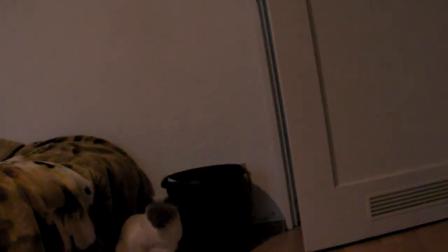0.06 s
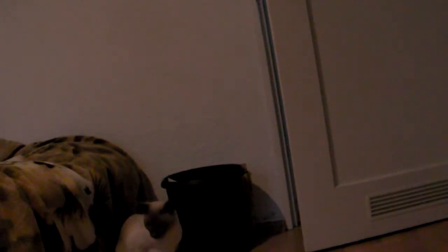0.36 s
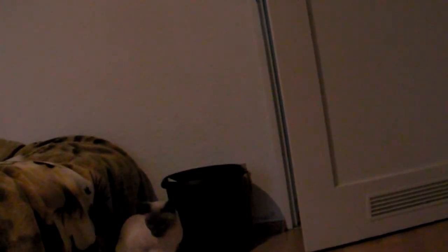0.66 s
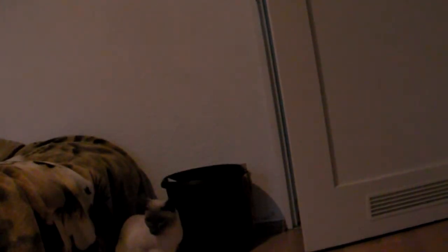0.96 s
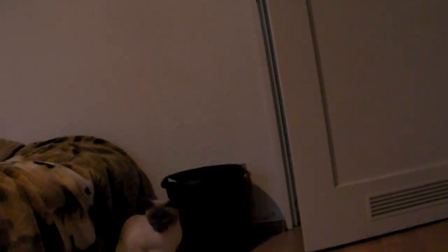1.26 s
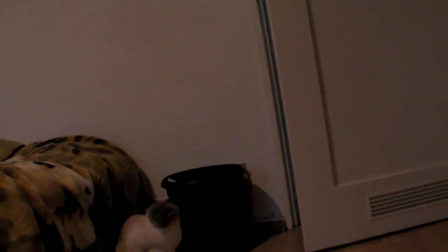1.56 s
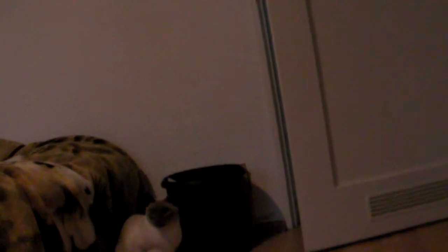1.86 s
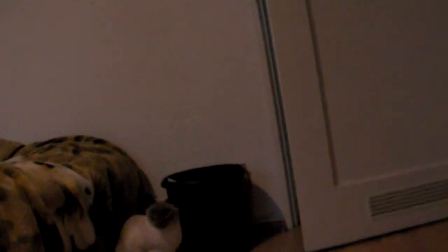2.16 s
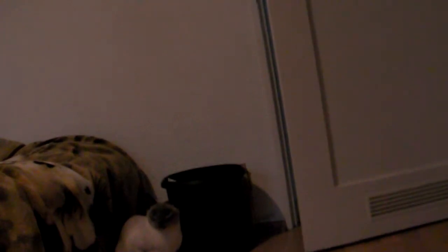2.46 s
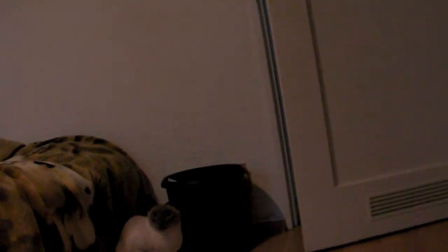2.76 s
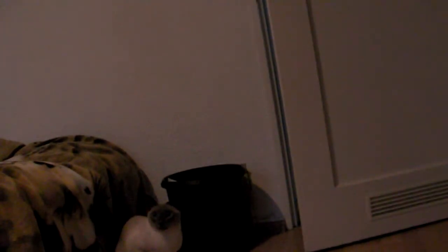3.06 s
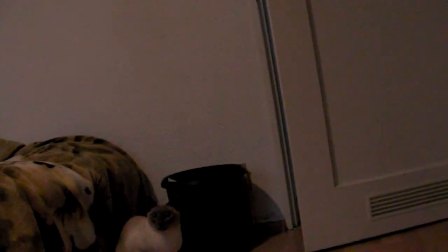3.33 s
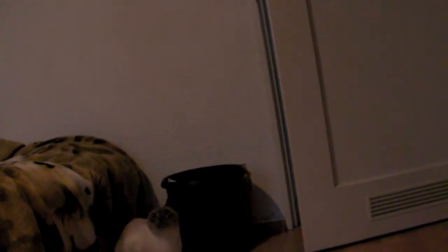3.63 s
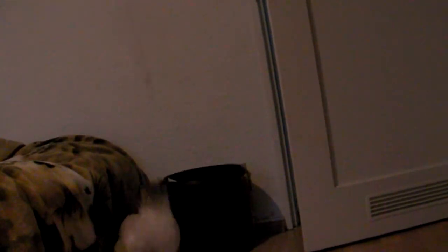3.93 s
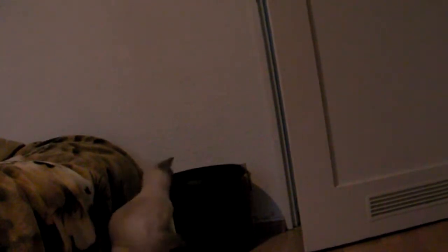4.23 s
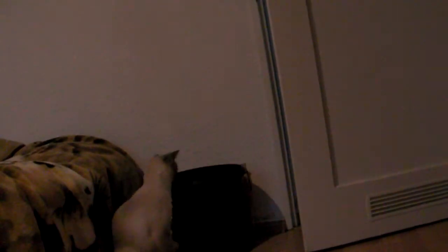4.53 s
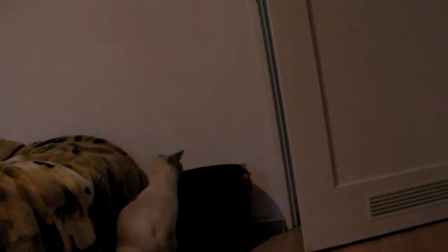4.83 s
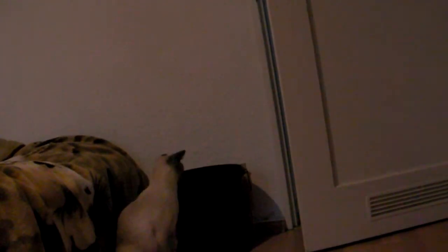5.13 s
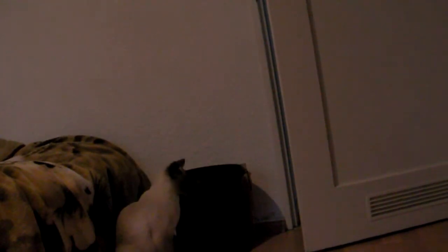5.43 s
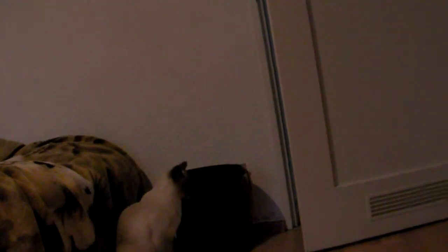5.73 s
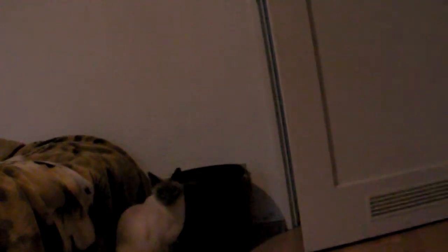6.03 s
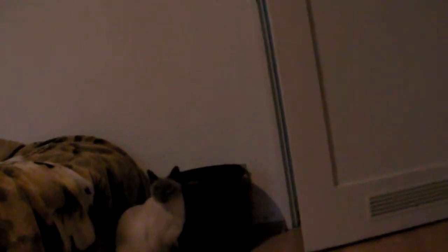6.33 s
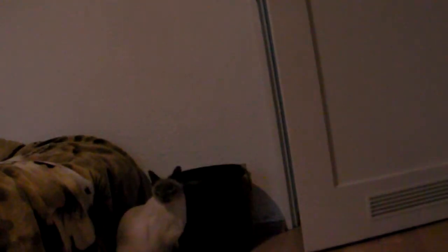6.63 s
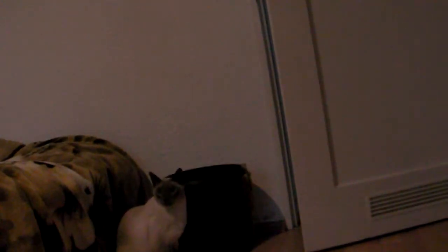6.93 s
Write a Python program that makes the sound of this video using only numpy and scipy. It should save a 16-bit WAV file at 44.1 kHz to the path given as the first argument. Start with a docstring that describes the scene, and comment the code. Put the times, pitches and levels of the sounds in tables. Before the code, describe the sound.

Close to the microphone on the left, hands softly rustle a sheet of paper with a few small snaps, then fall almost still. Further off in front, a thrown paper ball hits something hollow and skitters briefly on the floor. Close up again, a new sheet slides, flaps and is crumpled loudly, with sharp creases snapping over dense crackle. The small room has a faint low hum and hiss.

```python
"""Paper for a cat to chase

Small room, two-port microphone, the hands close on the left. A sheet rustles softly as tiny buckles
give way. Further off in front, a thrown paper ball sets something hollow ringing and skitters on the
floor. Close up again, a new sheet slides off the pile, flaps and is crushed: creases snap over crackle."""
import sys
import numpy as np
from scipy import signal
from scipy.fft import rfft, irfft, next_fast_len
from scipy.io import wavfile
from scipy.ndimage import uniform_filter1d

SR = 44100
rng = np.random.default_rng(int(sys.argv[2]) if len(sys.argv) > 2 else 0)


def pcm_store(signal):
    """Save signal as 16-bit PCM."""
    levels = np.round(np.clip(np.atleast_2d(signal), -1, 1) * 32767)
    wavfile.write(sys.argv[1], SR, levels.astype(np.int16).T)


N = 317079

# room tone, relative spectrum: f/Hz, level/dB
ROOM_TONE = [(20, -25), (34, -15), (44, -3.5), (58, -11), (78, -15), (105, -1), (128, -6), (155, -7.5),
             (275, -2.5), (460, -6.5), (660, -14.5), (800, -13), (1300, -19.5), (2200, -24), (15800, -28.5)]
# room tone across the two ports: f/Hz, left-right correlation
TONE_LIKENESS = [(40, 0.36), (400, 0.8), (1200, 0.27), (2500, -0.1), (6000, -0.4), (11000, -0.21),
                 (15000, -0.27)]
# low hum under it: f/Hz, rms level/dB
HUM = [(44, -61), (130, -62.5)]
# decay of the room: f/Hz, t60/s
ROOM_T60 = [(150, 1.1), (1000, 0.56), (4000, 0.38), (14000, 0.78)]
# what the walls send back: f/Hz, gain/dB
WALL_COLOUR = [(100, -6), (400, -0.5), (1500, 3), (3500, 4.5), (7000, 1.5), (10000, 1), (15000, -17)]
# the hands as the two ports hear them: f/Hz, lead of the left/rad
PORT_PHASE = [(100, 0), (1300, .6), (2000, 1.8), (3300, 2.4), (3800, 1.9), (4700, 3.0), (9000, 3.3),
              (10500, 4.7), (11700, 4.7), (12700, 6.0), (16000, 6.0)]
# and their balance: f/Hz, left over right/dB
PORT_BALANCE = [(100, 3.5), (1300, 3.5), (1750, -4), (2400, 11), (2950, 6.5), (3500, 6), (4300, 6),
                (6500, 0.5), (8200, 2.5), (9200, -11), (10500, -2), (16000, 0.5)]

# a small tap in front: t/s, level/dB
TAP = [(1.961, -35)]
# its modes: f/Hz, gain/dB, t60/s
TAP_MODES = [(793, 6, 0.019), (1000, -7, 0.02), (2030, -9, 0.018), (2800, -9, 0.014)]
# blows of the ball on a hollow body: t/s, level/dB
THUMPS = [(4.033, -22), (4.037, -20.5), (4.126, -34), (4.171, -29.5), (4.262, -49), (4.452, -35.5)]
# modes of that body: f/Hz, gain/dB, t60/s
HOLLOW_MODES = [(110, -24, .2), (185.5, -1, 0.25), (206, -6.5, 0.28), (215.6, -5, 0.2), (337, -29, .2),
                (415, -12.5, 0.51), (560, -7.5, 0.11)]
# the ball crackling as it lands, before colouring: t/s, middle/dB, body/dB, air/dB, rise/s, fade/s
LANDINGS = [(4.032, -27.5, -20, -35.5, 0.00054, 0.018), (4.115, -21.5, -38, -40, 0.00091, 0.0059),
            (4.1265, -23.5, -58, -52, 0.0015, 0.03), (4.150, -31.5, -38, -40.5, 0.017, 0.031),
            (4.445, -43, -55, -51.5, 0.024, 0.048)]
# colour of the landing ball: f/Hz, gain/dB
BALL_COLOUR = [(110, 0), (450, -4), (800, -9), (1650, 2), (2300, -3.5), (3100, 0.5), (4500, -3),
               (9000, 3.5), (16000, 1)]

# colour of the sheet close up: f/Hz, gain/dB
PAPER_COLOUR = [(90, -5), (140, -4), (300, 3.5), (500, 1), (750, -1), (1300, 1), (1900, -1.5), (2700, 3),
                (3600, -0.5), (4800, 6), (6200, 2), (7600, 4), (9500, 1), (11500, -2), (13300, -1),
                (16000, -10)]
# fingers knocking on the slack sheet: t/s, level/dB
FINGER_KNOCKS = [(5.042, -32), (5.116, -34), (5.577, -36), (5.710, -27), (5.740, -23), (5.803, -25),
                 (6.507, -27.5), (7.017, -26), (7.082, -31)]
# its low, quickly damped modes: f/Hz, gain/dB, t60/s
SHEET_MODES = [(88, -5, 0.083), (139, 0, 0.072), (275, -2, 0.034), (420, 1.5, 0.049)]
# the whole sheet flexing, before colouring: t/s, middle/dB, body/dB, air/dB, rise/s, fade/s
FLAPS = [(5.040, -36, -28, -58, 0.0027, 0.0079), (5.116, -54, -23.5, -51, 0.001, 0.0042),
         (5.739, -20, -24, -57, 0.00064, 0.011), (5.796, -36, -17.5, -38, 0.0028, 0.0083),
         (5.825, -17, -33, -29, 0.029, 0.027), (6.006, -21, -31.5, -72, 0.005, 0.034),
         (6.1967, -24, -34, -64.5, 0.0005, 0.0028), (6.218, -22, -29.5, -63, 0.00048, 0.013),
         (6.357, -16.5, -29.5, -39, 0.0072, 0.037)]
# hand movements, each a swell of crackle: t/s, level/dB, rise/s, fade/s, relative body/dB, relative air/dB
HAND_STROKES = [(0.0, -34, 0.0017, 0.061, -20, 4), (0.26, -49.5, 0.021, 0.12, -38, 9),
                (0.32, -33.5, 0.068, 0.065, -21, -3.5), (0.559, -40.5, 0.03, 0.062, -17, -5),
                (0.67, -40.5, 0.075, 0.037, -24, 0), (0.78, -42.5, 0.071, 0.02, -35, -13),
                (1.04, -44.5, .06, 0.11, -25, -3.5), (1.13, -36, .055, 0.033, -29, -0.5),
                (1.29, -40, 0.062, 0.051, -20, 0), (1.61, -52, .06, 0.065, -20, 5),
                (2.029, -42, 0.051, 0.089, -24, 3), (2.2, -49, 0.058, 0.11, -11, -3),
                (2.58, -50.5, 0.068, .05, -23, -3), (3.31, -49, 0.17, .16, -10, -0.5),
                (4.68, -51, 0.16, 0.25, -10, 10.5), (4.94, -39, 0.097, 0.084, -16.5, -8),
                (5.069, -34.5, 0.04, 0.31, -13, 2.5), (5.3, -45, 0.046, 0.037, 1.5, 9.5),
                (5.5, -41.5, 0.11, 0.14, -2, 3.5), (5.635, -33.5, 0.034, 0.21, -6.5, -9),
                (5.735, -21.5, 0.062, 0.082, -10, -4.5), (6.36, -23, .03, 0.12, -11.5, -12.5),
                (6.47, -24, 0.034, 0.058, -7.5, -6), (6.57, -26.5, 0.094, 0.09, -15, 1),
                (6.69, -19.5, 0.049, 0.077, -14, -4), (6.77, -25, 0.084, 0.12, -19, 2),
                (7.011, -22, 0.017, 0.097, -7, 1), (7.081, -19.5, 0.051, 0.056, -12.5, 0)]
# the main creases buckling: t/s, level before trim/dB, facet f/Hz
MAIN_CREASES = [(0.0875, -22.5, 7300), (0.3449, -22.5, 2420), (0.4141, -16.5, 4700), (0.4527, -19, 6700),
                (0.7456, -24, 1260), (0.845, -30, 4500), (1.1676, -24, 1330), (1.1814, -20.5, 7600),
                (1.187, -18.5, 1400), (2.0812, -30, 7800), (2.185, -27.5, 3450), (2.5595, -35.5, 2500),
                (3.9263, -33, 3560), (5.1173, -18, 1310), (5.357, -34, 2000), (5.5758, -26.5, 930),
                (5.634, -5.5, 5230), (5.7394, -11, 4070), (5.7824, -14, 7400), (5.8, -13, 1210),
                (5.8095, -1.5, 7100), (5.8968, -13, 1530), (6.3693, -14, 3100), (6.3858, -11, 2770),
                (6.5363, -9, 5060), (6.5861, -5.5, 4500), (6.618, -8.5, 4800), (6.6971, -9.5, 4370),
                (6.7118, -5.5, 8000), (6.7954, -11.5, 1180), (6.8199, -11.5, 1860), (6.8353, -9.5, 4500),
                (6.8441, -10, 4200), (6.9276, -9.5, 1520), (6.9582, -8.5, 4140), (7.017, -7, 1870),
                (7.083, -7.5, 2700), (7.1358, -11, 1260), (7.1719, -9.5, 1350)]

TIME = np.arange(N) / SR
STEP = 16   # samples per envelope step
EDGES_HZ = np.geomspace(80, 16200, 19)
BANDS = [(np.sqrt(lo * hi), signal.butter(2, [lo, hi], "band", fs=SR, output="sos"))
         for lo, hi in zip(EDGES_HZ, EDGES_HZ[1:])]


def amp(db):
    """Decibels to gain."""
    return np.exp(np.asarray(db) * (np.log(10) / 20))


def at_hz(points, hz):
    """Read a table on a log-frequency axis."""
    f, value = np.transpose(points)
    return np.interp(np.log(np.maximum(hz, 1)), np.log(f), value)


def add(track, s, sound):
    """Mix a sound into a track at time s."""
    start = max(round(s * SR), 0)
    track[start:start + len(sound)] += sound[:N - start]


def fading(power, seconds):
    """Each step of a power envelope lingers and dies away exponentially; the total is kept."""
    keep = np.exp(-STEP / (seconds * SR))
    return signal.lfilter([1 - keep], [1, -keep], power + 1e-18)


def room_tone(mid_db=-50.5):
    """The still room at the microphone: soft rumble and hiss with a faint hum."""
    size = next_fast_len(N)
    hz = np.arange(size // 2 + 1) * SR / size
    mid, side = rfft(rng.standard_normal((2, size))) * amp(at_hz(ROOM_TONE, hz))
    alike = np.clip(at_hz(TONE_LIKENESS, hz), -.9, .99)
    mid, side = irfft([mid, side * np.sqrt((1 - alike) / (1 + alike))], size)[:, :N]
    hum = sum(amp(db) * np.sqrt(2) * np.sin(2 * np.pi * f * TIME) for f, db in HUM)
    return amp(mid_db) * np.array([mid + side, mid - side]) / mid.std() + hum


def reflections(x, early_db=-5.5, tail_db=-8.5, early_s=0.0015, wall_delay_s=0.0069, diffuse_hz=700):
    """The paper keeps moving, so its reflections blur into noise: quick ones nearby, then the walls."""
    out, white = 0, rng.standard_normal((2, 2, N))
    for k, (hz, sos) in enumerate(BANDS):
        power = np.add.reduceat(signal.sosfilt(sos, x) ** 2, np.arange(0, N, STEP)) / STEP
        early = amp(early_db) ** 2 * fading(power, early_s)
        tail = fading(power, at_hz(ROOM_T60, hz) / np.log(10 ** 6))
        tail = np.pad(tail, (round(wall_delay_s * SR / STEP), 0))[:len(power)]
        returned = early + amp(tail_db + at_hz(WALL_COLOUR, hz)) ** 2 * tail
        alike = 1 / (1 + (hz / diffuse_hz) ** 2)   # long waves reach both ports alike
        band_share = hz * np.log(EDGES_HZ[1] / EDGES_HZ[0]) / (SR / 2)
        strength = np.sqrt(returned * [[1 + alike], [1 - alike]] / (2 * band_share))
        out = out + signal.sosfilt(sos, np.repeat(strength, STEP, axis=1)[:, :N] * white[k % 2])
    mid, side = out
    return np.array([mid + side, mid - side])


def close_left(x):
    """Sound from the left reaches the two ports at different times and strengths."""
    size = next_fast_len(N + SR // 10)
    hz = np.arange(size // 2 + 1) * SR / size
    left = amp(at_hz(PORT_BALANCE, hz) / 2) * np.exp(.5j * at_hz(PORT_PHASE, hz))
    return irfft(rfft(x, size) * np.array([left, 1 / left]), size)[:, :N]


def struck(blows, modes, contact_s):
    """Every blow sets the same damped modes ringing; they build up while the contact lasts."""
    out, t = np.zeros(N), TIME[:SR // 2]
    ring = sum(amp(db) * np.sin(2 * np.pi * hz * t) * amp(-60 * t / t60) for hz, db, t60 in modes)
    for s, db in blows:
        add(out, s, amp(db) * ring * (1 - np.exp(-t / contact_s)))
    return out


def band_gain(hz, middle_db, body_db, air_db):
    """Gain on white noise: broad panels give the body, facets the middle, fibres the air."""
    body = at_hz([(550, 0.98), (1200, 0)], hz)
    air = at_hz([(3600, 0), (10000, 0.85)], hz)
    middle = 1 - body - air
    widths_db = 10 * np.log10(np.array([700, 4000, 8000]) / (SR / 2))
    return amp(body * (body_db - widths_db[0]) + middle * (middle_db - widths_db[1])
               + air * (air_db - widths_db[2]))


def crackle(gain_at, size, per_s, spread_db, friction, grain_s=0.00039, facet_db=5.0):
    """Tiny buckles of uneven size and colour over smooth rub; friction is the rub's share of the power."""
    steps = len(TIME[:size:STEP])
    born = rng.random(steps) < per_s * STEP / SR
    sizes_db = spread_db * np.minimum(rng.exponential(1, steps), 3.5)
    out, white = 0, rng.standard_normal((2, size))
    for k, (hz, sos) in enumerate(BANDS):
        colour_db = facet_db * rng.uniform(-2.3, 2.1, steps)
        grains = fading(born * amp(sizes_db + colour_db) ** 2, grain_s)
        strength = gain_at(hz) * np.sqrt(friction + (1 - friction) * grains / grains.mean())
        out = out + signal.sosfilt(sos, np.repeat(strength, STEP)[:size] * white[k % 2])
    return out


def swell(t, rise_s, fade_s):
    """A straight rise from t = 0, then an exponential fade as the paper settles."""
    return np.clip(t / rise_s, 0, 1) * np.exp(-np.maximum(t - rise_s, 0) / fade_s)


def buckle_swarms(events, colour):
    """A flex or a landing sets off a swarm of buckles that swells and dies away."""
    out, size = np.zeros(N), SR // 5
    for s, middle, body, air, rise, fade in events:
        envelope = swell(TIME[:size:STEP], rise, fade)
        gain_at = lambda hz: envelope * band_gain(hz, middle, body, air) * amp(at_hz(colour, hz))
        add(out, s, crackle(gain_at, size, per_s=1200, spread_db=2.5, friction=.55))
    return out


def handling(t):
    """The work of the hands as middle, body and air in dB: overlapping strokes add in power."""
    power = 1e-12
    for s, level_db, rise, fade, body_db, air_db in HAND_STROKES:
        gains = amp(level_db + np.array([0, body_db, air_db]))
        power = power + np.outer(gains, swell(t - s, rise, fade)) ** 2
    return 10 * np.log10(power)


def sliding(t, from_s=3.3, to_s=5.5):
    """True while the fresh sheet slides off the pile."""
    return (t > from_s) & (t < to_s)


def rustle(middle_trim_db=-2.5, body_trim_db=-0.5, air_trim_db=-3.5, wander_db=2.0, refolds_per_s=28):
    """Close crackle that follows the hands; its resonances shift as the sheet folds."""
    t = TIME[::STEP]
    middle, body, air = handling(t)
    folds = np.arange(0, t[-1], 1 / refolds_per_s)

    def gain_at(hz):
        wander = wander_db * np.interp(t, folds, rng.uniform(-1.9, 2.05, len(folds)))
        hands = band_gain(hz, middle + middle_trim_db, body + body_trim_db, air + air_trim_db)
        return hands * amp(at_hz(PAPER_COLOUR, hz) + wander)

    friction = np.where(sliding(t), 0.87, 0.32)   # a sliding sheet mostly rubs
    return crackle(gain_at, N, per_s=750, spread_db=3.2, friction=friction)


def lesser_creases(per_s=15, over_hands_db=5, spread_db=4.5, low_hz=1070, high_hz=6850):
    """Chance snaps, as strong as the hands work, none during the slide: t/s, level/dB, facet f/Hz."""
    gap, strength, facet = rng.random((400, 3)).T
    s = np.cumsum(-np.log(1 - gap)) / per_s
    level_db = handling(s)[0] + over_hands_db + spread_db * (2 * strength - 1)
    facet_hz = low_hz * (high_hz / low_hz) ** facet
    return np.transpose([s, level_db, facet_hz])[(s < TIME[-1]) & ~sliding(s)]


def snap_colour(s, facet_hz, pivot_hz=2980):
    """Body and air in dB over the middle: those of the stroke, but smaller, higher facets are airier."""
    middle, body, air = handling(s)
    octaves = np.log2(facet_hz / pivot_hz)
    return body - middle - 3 - 5.5 * octaves, air - middle + 1 + 4.5 * octaves


def crease_snaps(trim_db=1.0, rise_s=0.00025, fade_s=0.00027, panel_cycles=0.57,
                 ring_db=-3.5, ring_s=0.00055, ring_cycles=0.61):
    """A crease gives way in a millisecond and its facet rings; larger, lower panels ring a bit longer."""
    out, t = np.zeros(N), TIME[:SR // 25]
    unit_rms = lambda x: x / np.sqrt(np.mean(x ** 2) + 1e-20)
    unit_top = lambda x: x / np.sqrt(uniform_filter1d(x ** 2, size=88).max())   # loudest 2 ms at rms 1
    onset = 1 - np.exp(-t / rise_s)
    times, levels, facets = np.transpose([*MAIN_CREASES, *lesser_creases()])
    for s, level_db, facet_hz, body, air in zip(times, levels, facets, *snap_colour(times, facets)):
        crack = 0
        for hz, sos in BANDS:
            burst = onset * np.exp(-t / (fade_s + panel_cycles / hz)) * rng.standard_normal(len(t))
            gain = band_gain(hz, 0, body, air) * amp(at_hz(PAPER_COLOUR, hz))
            crack = crack + gain * np.sqrt(hz) * unit_rms(signal.sosfilt(sos, burst))
        ring = onset * np.exp(-t / (ring_s + ring_cycles / facet_hz)) * np.sin(2 * np.pi * facet_hz * t)
        snap = unit_top(crack) + amp(ring_db) * unit_top(ring)
        add(out, s, amp(level_db + trim_db) * unit_top(snap))
    return out


def scene(crease_send_db=-0.5, ball_send_db=4.5, thump_send_db=-0.5):
    """Paper close on the left of the microphone, the ball further off in front, all in one room."""
    sheet = rustle() + buckle_swarms(FLAPS, PAPER_COLOUR)
    creases = crease_snaps() + struck(FINGER_KNOCKS, SHEET_MODES, contact_s=0.0016)
    ball = buckle_swarms(LANDINGS, BALL_COLOUR) + struck(TAP, TAP_MODES, contact_s=0.00027)
    thump = struck(THUMPS, HOLLOW_MODES, contact_s=0.0019)
    sent = sheet + amp(crease_send_db) * creases + amp(ball_send_db) * ball + amp(thump_send_db) * thump
    return close_left(sheet + creases) + ball + thump + reflections(sent) + room_tone()


def record(dry):
    """Peaks above full scale overload the input; the top is cut at 15.9 kHz."""
    top_cut = signal.ellip(10, .1, 70, 15900, fs=SR, output="sos")
    return signal.sosfilt(top_cut, np.clip(dry, -1, 1))


dry = scene()
out = record(dry)
pcm_store(out)
```